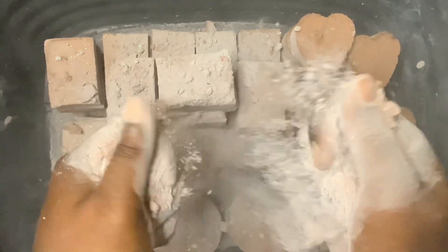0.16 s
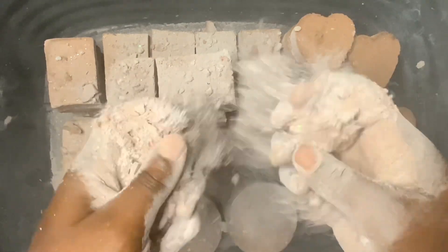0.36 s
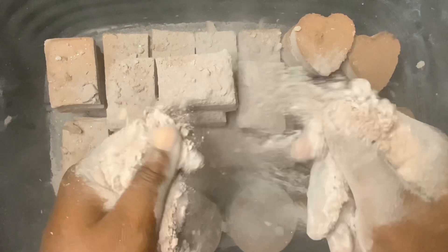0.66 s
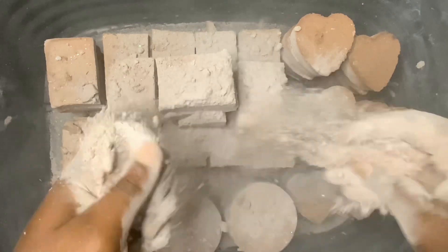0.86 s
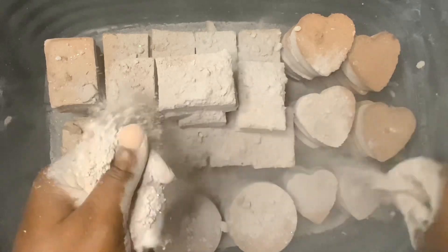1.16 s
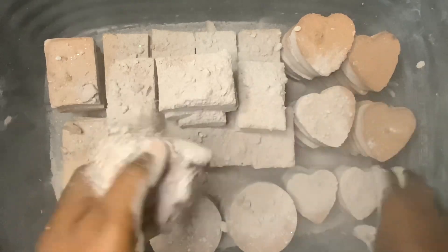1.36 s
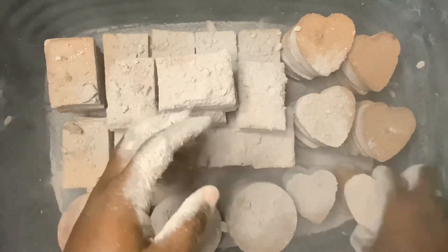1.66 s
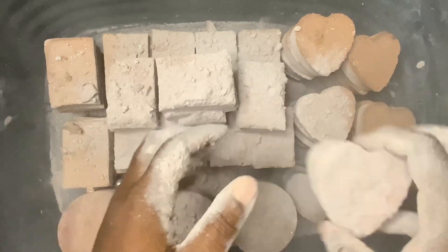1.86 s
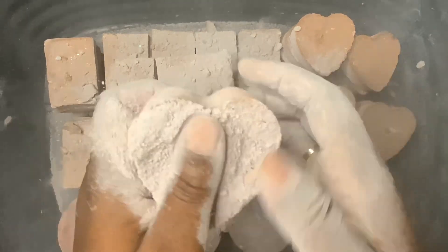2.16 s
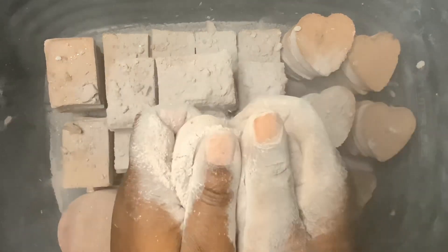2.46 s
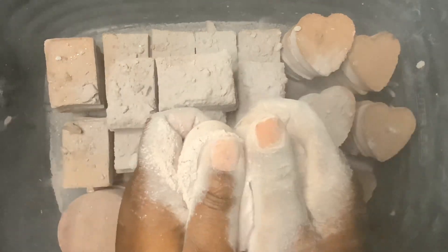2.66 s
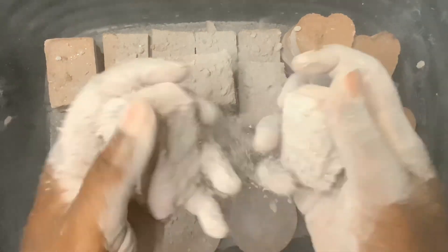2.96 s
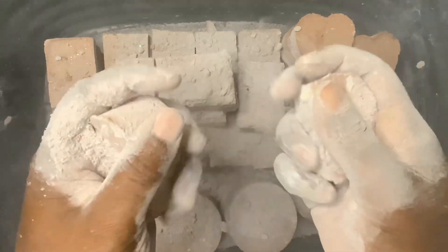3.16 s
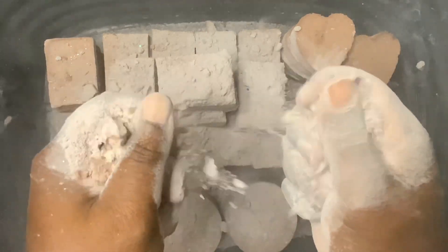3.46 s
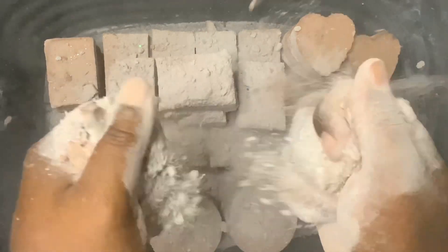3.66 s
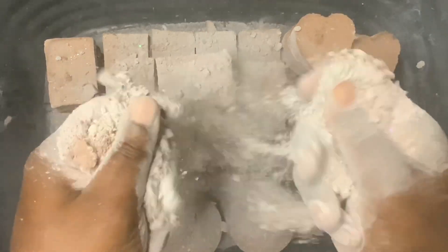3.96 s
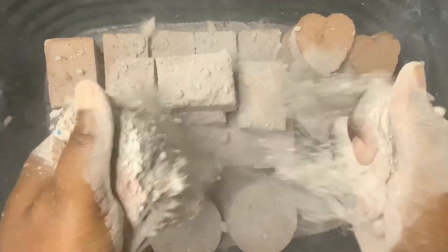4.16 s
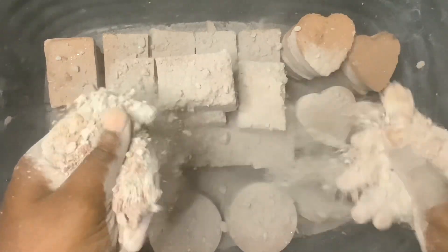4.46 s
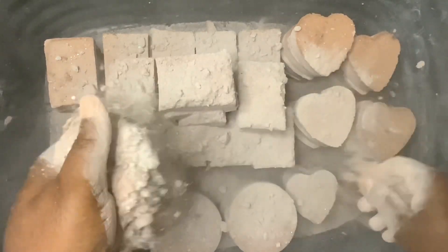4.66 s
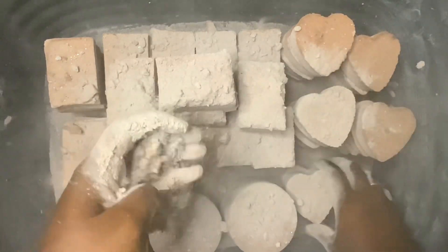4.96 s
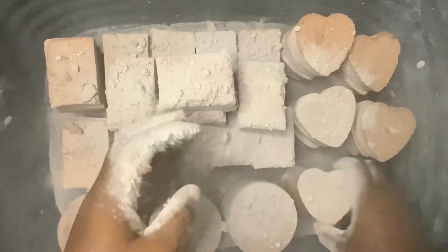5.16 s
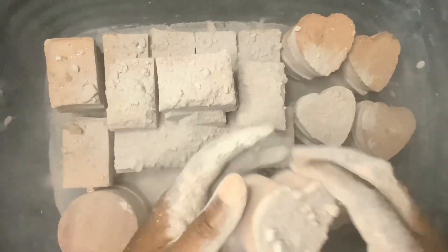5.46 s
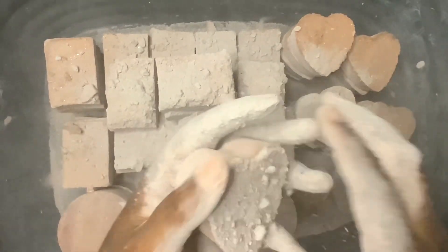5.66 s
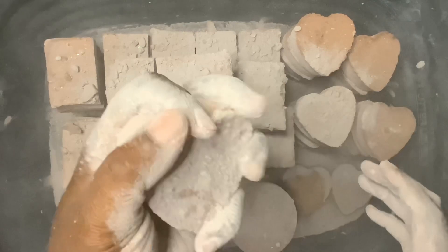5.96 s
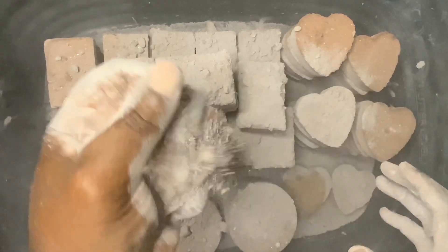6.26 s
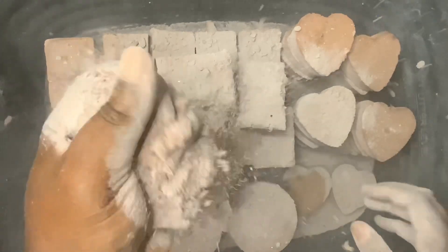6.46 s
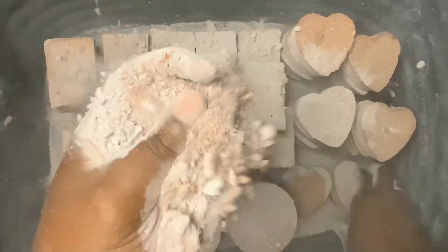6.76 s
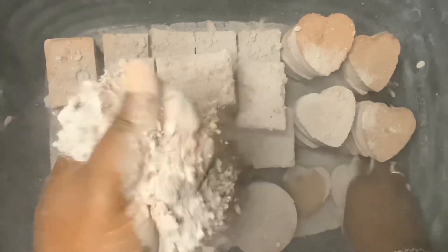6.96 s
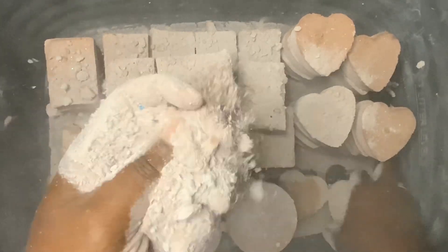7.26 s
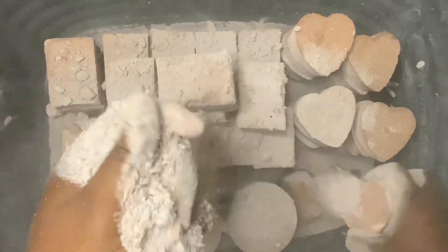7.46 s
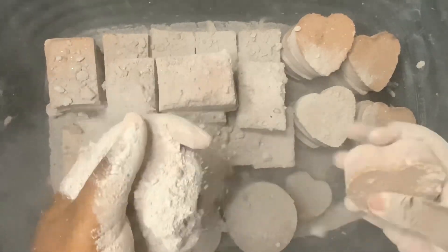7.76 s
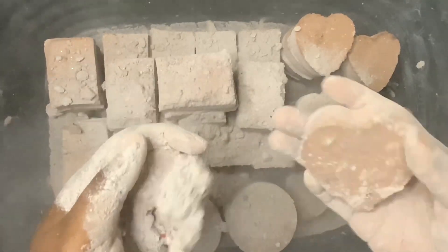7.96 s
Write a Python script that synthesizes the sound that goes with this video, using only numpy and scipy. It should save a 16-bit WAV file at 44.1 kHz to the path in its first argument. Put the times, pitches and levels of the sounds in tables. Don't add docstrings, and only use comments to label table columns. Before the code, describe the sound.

Dry chalky blocks crushed by hand, crackling and crumbling in bursts, with powdery hiss and crumbs pattering and thudding into a plastic tub.

```python
import sys
import numpy as np
from scipy import signal
from scipy.fft import rfft, irfft, next_fast_len
from scipy.io import wavfile
from scipy.ndimage import uniform_filter1d, map_coordinates

SR = 44100
rng = np.random.default_rng(int(sys.argv[2]) if len(sys.argv) > 2 else 0)


def bounce(signal):
    frames = np.transpose(np.atleast_2d(signal))
    limited = np.clip(frames, -1, 1)
    pcm = np.round(limited * 32767).astype(np.int16)
    wavfile.write(sys.argv[1], SR, pcm)


def invert_db(x):
    u = np.asarray(x, float) / 20
    return 10 ** u


N = 358091

# (frequency [Hz], width [Hz], level [dB])
TUB_MODES = [(89.5, 33.5, -3.5), (163.8, 7.4, 0.5), (207.2, 24, -1.5), (329.7, 67, -1.5), (412.2, 70, -4.5),
             (540, 64, -6), (690, 39, -6), (950, 134, -14)]


def unit(x):
    return x / np.sqrt(np.mean(x ** 2) + 1e-20)


def along(points, hz):
    f, *cols = np.transpose(points)
    return np.squeeze([np.interp(np.log(hz + 1), np.log(f + 1), c) for c in cols])


def filtered(x, response):
    m = next_fast_len(x.shape[-1] + 8192)
    spectrum = rfft(x, m) * response(np.fft.rfftfreq(m, 1 / SR))
    return irfft(spectrum, m)[..., :x.shape[-1]]


def peak(f, hz, width):
    return 1j * f * width / (hz * hz - f * f + 1j * f * width)


def wobble(rate):
    knots = rng.standard_normal(int(N * rate / SR) + 4)
    return map_coordinates(knots, [np.arange(N) * rate / SR])


def rubble(rate, spread_db, life, clump_db, bed):
    struck = rng.random(N) < rate / SR
    sizes = struck * invert_db(spread_db * np.minimum(rng.exponential(size=N), 3))
    keep = np.exp(-1 / (life * SR))
    puffs = signal.lfilter([1], [1, -2 * keep, keep ** 2], sizes)
    swell = invert_db(clump_db * (wobble(14) + 0.69 * wobble(45)))
    return unit(swell * (bed + unit(puffs))) * rng.standard_normal((2, N))


def patchy(x, patchy_db):
    z = signal.stft(x, nperseg=256)[2]
    field = rng.standard_normal(z.shape[1:])
    for axis in (0, 1):
        field = uniform_filter1d(field, size=6, axis=axis)
    return signal.istft(z * invert_db(patchy_db * unit(field)), nperseg=256)[1][:, :N]


def swells(bed_db, rows):
    t = np.arange(N) / SR
    for s, db, rise, fall in rows:
        bed_db = np.maximum(bed_db, db - 10 * np.maximum((s - t) / rise, (t - s) / fall))
    return bed_db


def hush():
    # (frequency [Hz], level [dB])
    quiet = [(30, -5.5), (90, 2.5), (300, 1.5), (700, -32), (2000, -24), (15500, -33)]
    noise = rng.standard_normal((2, N))
    return invert_db(-64) * unit(filtered(noise, lambda f: invert_db(along(quiet, f))))


def room(x):
    # (frequency [Hz], t60 [s])
    decay = [(150, 0.28), (1000, 0.31), (8000, 0.13)]
    hz, t, z = signal.stft(rng.standard_normal((2, SR // 3)), SR, nperseg=256)
    fade = invert_db(-60 * t / along(decay, hz)[:, None])
    tail = signal.istft(z * fade, SR, nperseg=256)[1]
    late = np.pad(x, ((0, 0), (150, 0)))
    return signal.fftconvolve(late, tail / np.linalg.norm(tail[0]), axes=1)[:, :N]


def tub(f):
    return sum((-1) ** k * invert_db(db) * peak(f, hz, w) for k, (hz, w, db) in enumerate(TUB_MODES))


def thuds():
    # (time [s], level [dB], boom [Hz], t60 [s])
    blows = [(0.0465, -34.5, 187, 0.062), (0.6234, -26.5, 379, 0.1), (0.8564, -25.5, 323, 0.079),
             (1.0381, -31.5, 358, 0.035), (1.3249, -37, 347, 0.12), (2.6813, -18, 212, 0.048),
             (3.326, -29.0, 179, 0.029), (3.6913, -20.5, 330, 0.025), (3.7127, -24, 332, 0.063),
             (4.1534, -30, 320, 0.114), (4.2416, -15, 208, 0.11), (4.2915, -17, 409, 0.052),
             (6.5408, -28.5, 191, 0.38), (6.6618, -32.5, 162, 0.084), (6.7353, -18, 321, 0.093),
             (6.7716, -26, 314, 0.031), (6.8576, -13, 420, 0.071), (6.8752, -13.5, 181, 0.079),
             (6.929, -23, 350, 0.078), (6.969, -29.5, 441, 0.13), (7.0992, -16.5, 184, 0.16),
             (7.1735, -25.5, 348, 0.054), (7.2087, -26.5, 150, 0.082), (7.3437, -21.5, 371, 0.14),
             (7.3719, -19.5, 348, 0.074), (7.4408, -32, 174, 0.23)]
    out, t = np.zeros(N + SR), np.arange(SR // 4) / SR
    for s, db, hz, t60 in blows:
        fade = np.clip(1.25 * t60, .03, .35)
        boom = np.sin(2 * np.pi * hz * t) * invert_db(-60 * t / fade)
        for mode_hz, width, mode_db in TUB_MODES[:5]:
            near_db = mode_db - 6 * abs(np.log2(mode_hz / hz)) + rng.normal(1.8, 6)
            ring = invert_db(near_db - 60 * t / min(fade, 4.1 / width))
            boom += ring * np.sin(2 * np.pi * mode_hz * rng.normal(1, 0.03) * t)
        boom *= 1 - np.exp(-t / .0025)
        out[round(s * SR):][:len(t)] += invert_db(db + 6.0) * boom / np.abs(boom).max()
    return out[:N] * [[1], [0]]


def knocks():
    # (time [s], level [dB], note [Hz], t60 [s])
    lumps = [(0.3465, -31, 725, 0.013), (0.6204, -34, 1400, 0.009), (0.8619, -20.5, 980, 0.021),
             (1.0379, -23.5, 950, 0.016), (1.2823, -24.5, 1410, 0.059), (2.6792, -25.5, 690, 0.0072),
             (2.963, -37, 620, 0.019), (3.4346, -40, 716, 0.015), (3.6129, -40, 720, 0.038),
             (3.6909, -14.5, 670, 0.021), (3.7178, -24, 886, 0.015), (3.8143, -29, 690, 0.0093),
             (4.1263, -24, 820, 0.031), (4.2355, -16.5, 540, 0.028), (4.2645, -18.7, 525, 0.024),
             (4.2957, -6, 664, 0.026), (4.9882, -37, 1010, 0.021), (5.7879, -36, 540, 0.034),
             (5.8945, -37.4, 920, 0.013), (6.4226, -29.5, 725, 0.012), (6.651, -22.0, 715, 0.022),
             (6.7344, -27, 546, 0.017), (6.8579, -5.5, 570, 0.016), (6.9327, -10.5, 923, 0.026),
             (6.9502, -17, 950, 0.04), (7.0956, -31, 1430, 0.015), (7.3416, -25.0, 670, 0.03),
             (7.4381, -28, 540, 0.025)]
    out, t = np.zeros((2, N + SR)), np.arange(SR // 5) / SR
    for s, db, hz, t60 in lumps:
        fade = invert_db(-60 * t / np.clip(1.13 * t60, .01, .2))
        noise = fade ** 0.34 * rng.standard_normal((2, len(t)))
        rattle = filtered(noise, lambda f: tub(f) * peak(f, 764, 600) ** 2)
        note = (1 - np.exp(-t / 0.00035)) * fade * np.sin(2 * np.pi * hz * t) * [[1], [0]]
        out[:, round(s * SR):][:, :len(t)] += invert_db(db + 4.0) * (note + .5 * rattle / np.abs(rattle).max())
    return out[:, :N]


def work():
    # (time [s], squeeze [dB], crumbs falling [dB])
    effort = [(0, -43, -39), (.8, -44, -39), (1.25, -39.5, -42), (1.65, -49.5, -41.5), (1.87, -50.5, -42),
              (1.98, -65, -62), (2.38, -59, -54), (2.52, -72, -64), (2.8, -64, -58), (3.25, -57, -54),
              (3.55, -46, -47), (3.85, -42, -39), (4.8, -38, -37.5), (5.17, -48, -37), (5.5, -66, -60),
              (6.38, -55, -46), (6.55, -41, -40), (7.7, -43, -46)]
    s, *cols = np.transpose(effort)
    t = np.arange(N) / SR
    let_go_db = np.minimum(70 * np.maximum(t - s[-1], 0), 18)
    return [np.interp(t, s, c) - let_go_db for c in cols]


def chalk(f):
    # (frequency [Hz], width [Hz], level [dB])
    block_tones = [(2400, 170, -7), (2900, 170, -7), (3750, 200, -6), (4410, 190, -2)]
    return sum(invert_db(db) * peak(f, hz, w) ** 2 for hz, w, db in block_tones)


def rub():
    # (frequency [Hz], level [dB])
    powder = [(1900, -57), (2500, -14.5), (5100, -7), (5800, -5), (7300, 1.5), (9000, -6), (12500, -4.5),
              (15500, -8)]
    # (time [s], hiss [dB], rise [s per 10 dB], fall [s per 10 dB])
    strokes = [(.087, -38, .1, .2), (.845, -34, .05, .13), (1.06, -38, .06, .3), (1.694, -43, .06, .15),
               (1.886, -43, .045, .05), (2.038, -34.5, .012, .065), (2.232, -38, .085, .01),
               (2.303, -31, .027, .026), (2.42, -50, .08, .027), (2.681, -32.5, .002, .037),
               (2.85, -37, .012, .3), (2.958, -32, .1, .04), (3.028, -30, .04, .018),
               (3.145, -36, .045, .08), (3.31, -37, .04, .08), (3.49, -36, .12, .14), (4.578, -31, .08, .1),
               (4.787, -35, .2, .14), (5.393, -50, .07, .045), (5.53, -37, .005, .04),
               (5.762, -39, .03, .07), (6.062, -34, .003, .07), (6.242, -29.5, .027, .08),
               (6.475, -33, .012, .1), (7.174, -33, .09, .1), (7.64, -33, .07, .085),
               (7.838, -37, .045, .12), (8.071, -32.5, .09, .08)]
    # (start [s], end [s], tones [dB])
    stroked = [
        (0.925, 1.05, -3.5),
        (1.99, 2.37, -15),
        (5.495, 5.85, -14),
        (7.253, 8.108, -24),
    ]
    t = np.arange(N) / SR
    dust = patchy(rubble(600, 4.3, 0.001, 0.87, 1.6), patchy_db=3)
    hiss = filtered(dust, lambda f: invert_db(along(powder, f)))
    tones = patchy(filtered(dust, chalk), patchy_db=2.5)
    held = 0
    for start, end, level in stroked:
        held = held + invert_db(level) * np.clip(np.minimum(t - start, end - t) / 0.022, 0, 1)
    dust_db = swells(work()[0] + 2.5, strokes)
    return invert_db(dust_db - 3.0) * (unit(hiss) + held * unit(tones))


def chips(rate, centre_hz, spread, turns, size_db, clump):
    draw = rng.random((int(rate * N / SR), 6, 3))
    cluster = (len(draw), 1)
    start = rng.random(cluster) * N - clump * SR * np.log(draw[..., 0] + 1e-3)
    pitch = spread * (rng.standard_normal(cluster) + 0.41 * rng.standard_normal(start.shape))
    step = np.arange(200)
    cycles = step / SR * np.clip(centre_hz * np.exp(pitch), 700, 14000).reshape(-1, 1)
    size = invert_db(-size_db * np.log(draw[..., 1] + 0.034)).reshape(-1, 1)
    rings = size * cycles * np.exp(-cycles / turns) * np.sin(2 * np.pi * cycles)
    at = np.minimum(start, N).astype(int).reshape(-1, 1) + step
    late = (draw[..., 2] * 40).astype(int).reshape(-1, 1)
    return unit(np.array([np.bincount(k.ravel(), rings.ravel(), N + 400)[:N] for k in (at, at + late)]))


def crumble():
    # (frequency [Hz], level [dB])
    grit_colour = [(500, -50), (900, 5), (2000, -6), (3600, -2), (9000, -36.5)]
    # (time [s], grit [dB], crumbs [dB], tub shaken [dB])
    collapses = [(.02, -37, -36, -58), (.87, -40, -35, -57), (1.35, -38.5, -40, -41), (1.5, -45, -39, -36),
                 (2.7, -55, -49, -43), (2.99, -56, -39.5, -55), (3.32, -50, -37.5, -46),
                 (3.73, -37.5, -50, -54), (4.28, -37.5, -28, -46), (5.15, -48, -35.5, -44),
                 (5.77, -55, -45, -49), (6.26, -34.5, -33.5, -34), (6.52, -39, -31.5, -60),
                 (6.9, -32.5, -16.5, -14.5), (7.15, -34, -29.5, -47), (7.37, -37.5, -22, -37),
                 (7.7, -44, -31.5, -38)]
    give, settle, shake = .05, .09, .1
    squeeze_db, fall_db = work()
    grit_db = swells(squeeze_db, [(s, db, give, settle) for s, db, _, _ in collapses])
    patter_db = swells(fall_db, [(s, db, give, settle) for s, _, db, _ in collapses])
    rumble_db = swells(fall_db - 19, [(s, db, give, shake) for s, _, _, db in collapses])

    grains = patchy(rubble(300, 2.7, 0.0021, 2.7, 1.0), patchy_db=-1)
    bed = filtered(grains, lambda f: invert_db(along(grit_colour, f)))
    grit = unit(bed) + 0.99 * chips(60, 2540, 0.53, 0.72, 5.2, .015)
    patter = filtered(rubble(250, 3, 0.0013, 1.0, 0.96), lambda f: tub(f) * peak(f, 250, 594))
    floor = lambda f: peak(f, 91, 52) ** 2 + 0.62 * peak(f, 165, 37) ** 2
    rumble = filtered(rubble(26, 1.6, 0.0088, 0.37, 1.7), floor)
    return invert_db(grit_db - 6) * grit + invert_db(patter_db - 5.5) * unit(patter) + invert_db(rumble_db - 1.5) * unit(rumble)


def snaps():
    # (time [s], level [dB], pitch [Hz], t60 [s], broad crack [dB])
    fractures = [(.1307, -22.5, 5350, .014, -28), (.3097, -19.5, 2980, .011, -6.5),
                 (.396, -19, 7300, .0063, -2), (.8546, -16.5, 2210, .0083, -12),
                 (.8616, -16, 2240, .0092, -32), (1.263, -20, 1920, .005, -39),
                 (1.2832, -17, 1800, .006, -41), (3.718, -10, 4260, .005, -9),
                 (4.104, -12.5, 7060, .016, -28), (4.1264, -10.5, 2580, .019, -24),
                 (4.2525, -19, 6860, .014, -5), (4.2946, -18, 1370, .021, -41),
                 (4.5693, -18, 7450, .006, -25), (4.7173, -22, 10850, .021, 5),
                 (4.8293, -18.5, 1800, .005, -35), (6.4736, -20, 2760, .016, 0),
                 (6.596, -21, 7340, .0095, -14), (6.6489, -19, 1770, .026, -48),
                 (6.8573, -17, 2730, .014, -14), (6.93, -9, 1500, .005, -22),
                 (7.0964, -16.4, 1580, .021, -19), (7.172, -12.4, 3520, .0072, 0)]
    # (time [s], level [dB], pitch [Hz])
    flakes = [(.0602, -25.5, 13210), (.0893, -23, 5300), (.3793, -29, 8350), (.533, -28.5, 7240),
              (.62, -23.5, 4900), (.9435, -25.6, 6600), (1.1843, -25.5, 6240), (1.215, -23.5, 4400),
              (1.81, -34, 7460), (2.031, -33.5, 6110), (3.135, -32, 7010), (3.2708, -33, 3750),
              (4.004, -26.5, 5070), (4.3711, -23, 8400), (4.51, -26.5, 4400), (4.599, -22.5, 7000),
              (4.801, -22.5, 3680), (6.065, -26, 4070), (6.1913, -28.5, 7300), (6.4524, -30.5, 11700),
              (7.0617, -29, 4040)]
    # (time [s], level [dB], pitch [Hz])
    chunks = [(.806, -29, 2340), (.9173, -24.5, 3040), (1.0485, -24.5, 2750), (1.3039, -25, 1910),
              (1.7582, -37.5, 2060), (2.3843, -30.5, 3300), (2.6779, -26.5, 2120), (2.7192, -32, 2060),
              (3.3227, -27, 1640), (3.433, -32.5, 2890), (3.6127, -32.5, 1820), (3.7724, -26.5, 2760),
              (4.7033, -25, 2040), (4.773, -23, 2040), (5.1713, -31.5, 2820), (5.997, -37.5, 2700),
              (6.1545, -30, 1630), (6.2515, -27.5, 2740), (6.54, -25.5, 3190), (6.662, -22, 1960),
              (6.8706, -21, 1430), (6.993, -28.5, 2220), (7.655, -29.5, 2180), (7.7096, -26, 1920),
              (7.8274, -23.5, 3100)]
    # (t60 [s], broad crack [dB])
    flake_ring = (.024, -16)
    chunk_ring = (.022, -18)
    breaks = [*fractures]
    breaks += [(*row, *flake_ring) for row in flakes]
    breaks += [(*row, *chunk_ring) for row in chunks]
    out, t = np.zeros((2, N + SR)), np.arange(SR // 10) / SR
    for s, db, hz, t60, crack_db in breaks:
        span = np.clip(t60, .004, .08)
        shape = (1 - np.exp(-t / 0.00038)) * invert_db(-60 * (t / span) ** 1.15)
        burst = shape * rng.standard_normal((2, len(t)))
        colour = lambda f: peak(f, hz, 0.34 * hz) * peak(f, hz, 2 * hz) + invert_db(crack_db + 3.5) * peak(f, 3100, 9000)
        burst = filtered(burst, colour)
        dust = invert_db(-60 * t / 0.43) * rng.standard_normal((2, len(t)))
        spill = filtered(dust, lambda f: peak(f, hz, 1.3 * hz))
        both = burst / np.abs(burst).max() + .07 * spill / np.abs(spill).max()
        out[:, round(s * SR):][:, :len(t)] += invert_db(db + 6) * both
    return out[:, :N]


def scene():
    hands = rub() + crumble() + snaps() + knocks() + thuds()
    return hands + invert_db(-12.5) * room(hands) + hush()


def far_port(f):
    # (frequency [Hz], level [dB], lag [half turns], likeness [0-1])
    shading = [(80, -1.5, .08, .99), (300, -3.5, .2, .98), (550, -8, .5, .8), (780, -5, .85, .93),
               (1000, 1.5, 1, .94), (1450, 0, 1.06, .93), (2000, -5, 1.3, .87), (2700, -12, 2.1, .5),
               (3500, -10, 3, .6), (4300, -7, 3.6, .82), (5400, -3, 4, .92), (7100, -9, 4, .97),
               (9500, -5, 4, .98), (12500, 0, 4, .96)]
    level_db, lag, alike = along(shading, f)
    alike = np.clip(alike, 0, 1)
    return invert_db(level_db) * np.exp(-1j * np.pi * lag) * [alike, np.sqrt(1 - alike ** 2)]


def roll_off(x):
    return signal.sosfilt(signal.butter(12, 16990, fs=SR, output="sos"), x)


def record(dry):
    ports = np.array([filtered(dry, far_port).sum(axis=0), dry[0]])
    low_cut = lambda f: (1j * f / (55 + 1j * f)) ** 3
    band_limit = lambda f: np.where(f < 15800, 1, invert_db(-31.5))
    ports = filtered(ports, lambda f: band_limit(f) * low_cut(f))
    return roll_off(np.clip(ports, -1, 1))


dry = scene()
out = record(dry)
bounce(out)
```